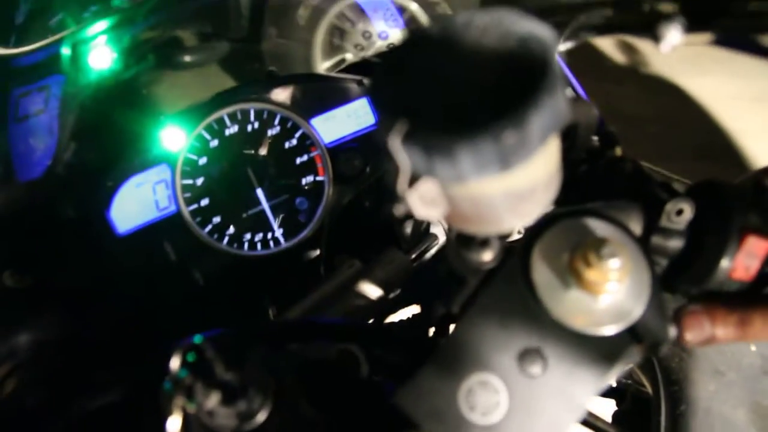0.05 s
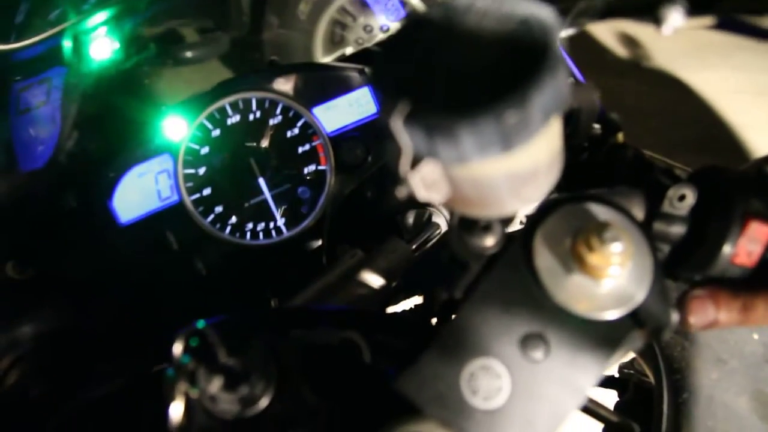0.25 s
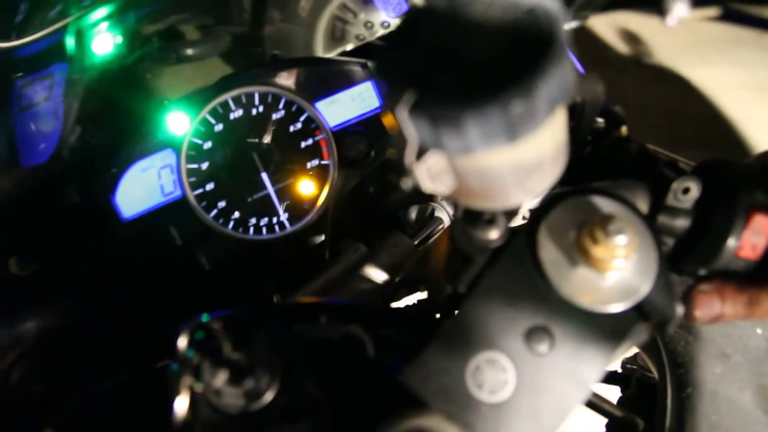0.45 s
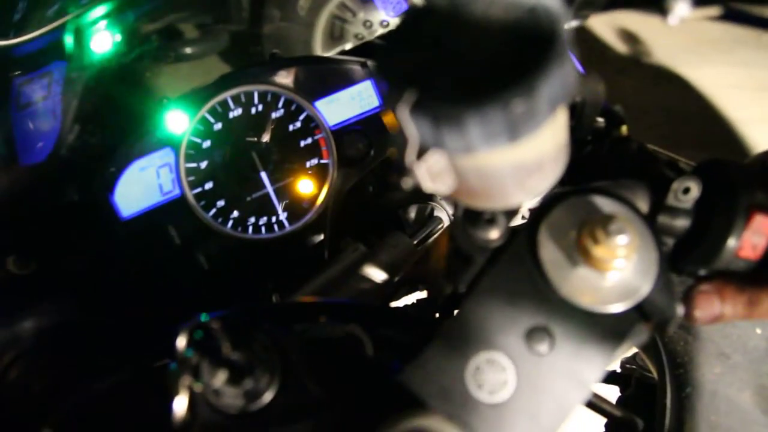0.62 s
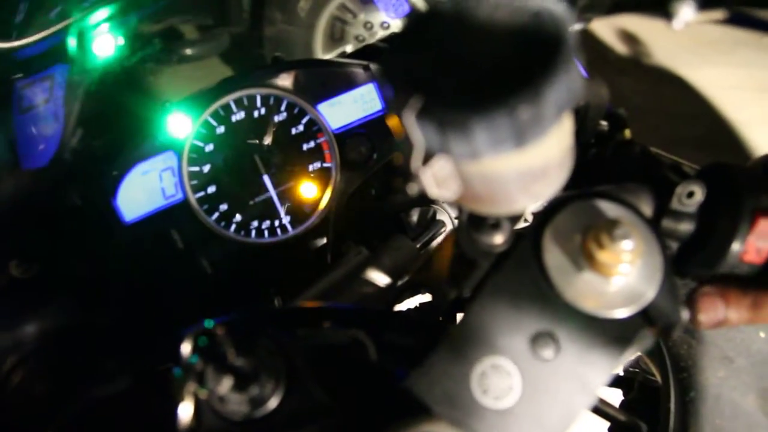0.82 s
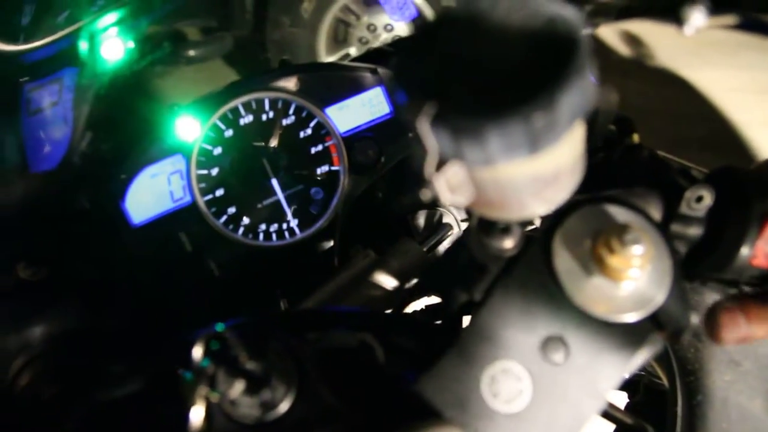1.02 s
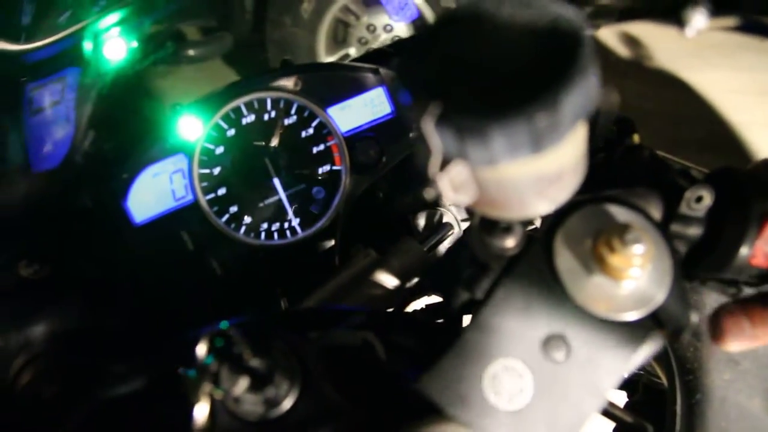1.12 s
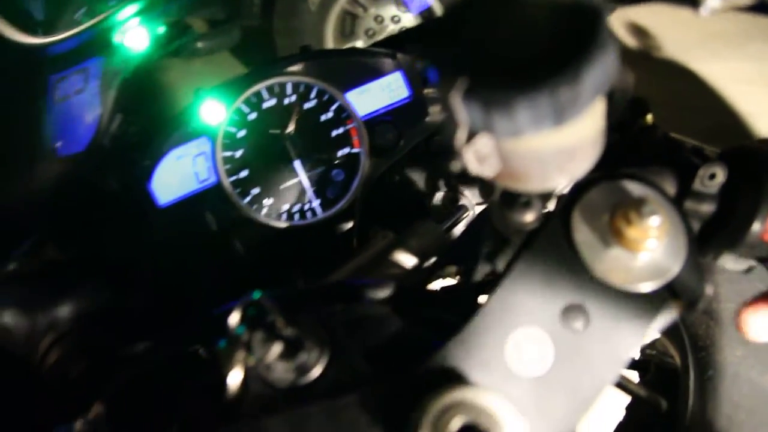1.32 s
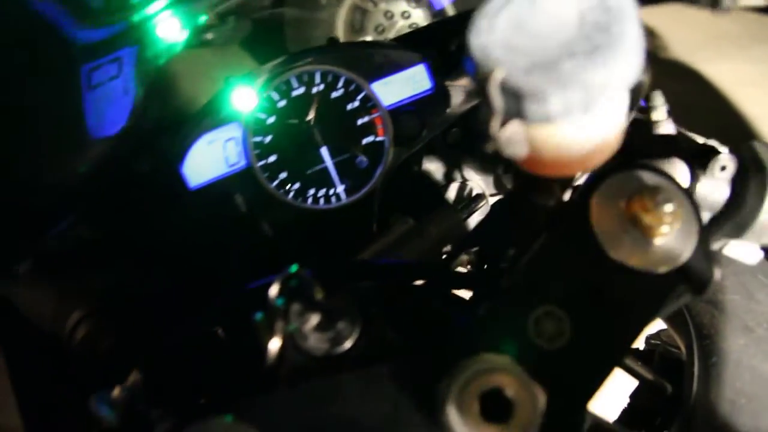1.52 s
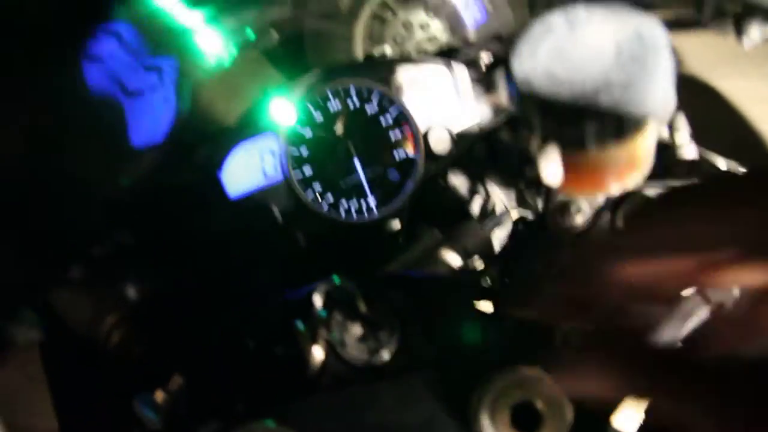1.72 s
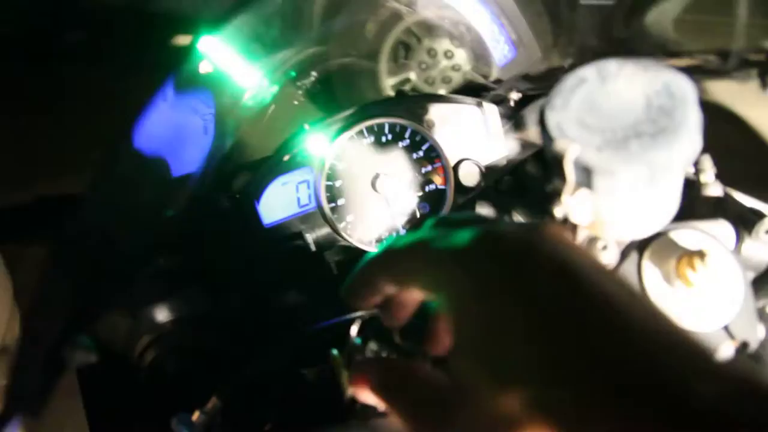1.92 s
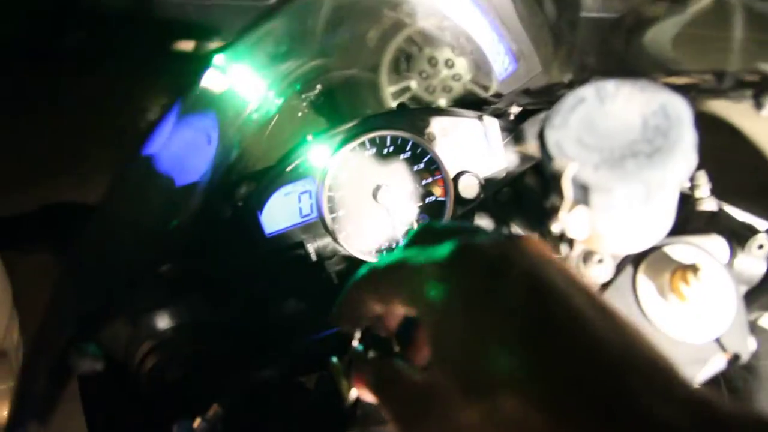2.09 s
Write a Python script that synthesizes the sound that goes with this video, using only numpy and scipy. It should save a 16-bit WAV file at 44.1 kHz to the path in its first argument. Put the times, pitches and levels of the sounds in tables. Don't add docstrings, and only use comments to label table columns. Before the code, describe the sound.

Close outdoor recording at night: steady insect whine, a relay clack, a short gritty whirring grind from a motorbike starter, quick rattling stop, small springy button clicks, then insects, faint traffic rumble and light cloth rustle.

```python
import sys
import numpy as np
from scipy import signal
from scipy.fft import rfft, irfft, next_fast_len
from scipy.io import wavfile
from scipy.ndimage import map_coordinates

SR = 44100
rng = np.random.default_rng(int(sys.argv[2]) if len(sys.argv) > 2 else 0)


def output_pcm(signal):
    pcm = np.clip(np.atleast_2d(signal).T, -1, 1) * 32767
    wavfile.write(sys.argv[1], SR, np.round(pcm).astype(np.int16))


def to_linear_factor(level_db):
    exponent = np.asarray(level_db, float) / 20
    return 10 ** exponent


N = 94815
TIME = np.arange(N) / SR


def unit(x):
    return x / np.sqrt(np.mean(x ** 2) + 1e-20)


def along(points, hz):
    f, v = np.transpose(points)
    return np.interp(np.log(hz + 1), np.log(f + 1), v)


def curves(rows):
    s, *cols = np.transpose(rows)
    return [np.interp(TIME, s, c) for c in cols]


def wobble(rate):
    return map_coordinates(rng.standard_normal(4000), [TIME * rate])


def filtered(x, response):
    m = next_fast_len(N + SR // 2)
    return irfft(rfft(x, m) * response(np.fft.rfftfreq(m, 1 / SR)), m)[..., :N]


def peaks(rows):
    def response(f):
        total = 0
        for k, (hz, width, db) in enumerate(rows):
            damping = 1j * f * width
            total = total + (-1) ** k * to_linear_factor(db) * damping / (hz * hz - f * f + damping)
        return total
    return response


def noise(points):
    return unit(filtered(rng.standard_normal(N), lambda hz: to_linear_factor(along(points, hz))))


def band(hz, width_hz):
    return unit(filtered(rng.standard_normal(N), lambda f: peaks([(hz, width_hz, 0)])(f) ** 2))


def burst(s, t60, rise_s):
    t = np.clip(TIME - s, 0, None)
    return to_linear_factor(-60 * t / t60) * (1 - np.exp(-t / rise_s))


# (time [s], grinding force [dB], armature whine [dB])
EFFORT = [
    (.278, -24.5, -38),
    (.292, -18, -47),
    (.324, -18, -30),
    (.42, -17.5, -27),
    (.56, -17.5, -27),
    (.64, -20.5, -40),
    (.72, -20, -39),
    (.785, -18, -27),
    (.83, -57, -74),
]
# (time [s], strength [dB])
CATCHES = [(0.284, -11.5), (0.304, -24), (.351, -15), (0.545, -13.5), (.585, -20), (0.619, -15),
           (0.649, -19), (0.656, -13), (0.69, -16.5), (0.735, -16.5), (0.758, -15.5), (0.781, -20),
           (0.798, -25), (.817, -21.5)]
# (frequency [Hz], width [Hz], level [dB])
CASING = [(323, 116, -4), (413, 46, -21), (1282, 45, 4.5), (1963, 61, -4), (3095, 210, 3.5), (3270, 120, 4),
          (3340, 130, 3), (3770, 43, -20), (4500, 74, -33), (5640, 31, 12.5), (7400, 46, -3.5),
          (8500, 220, 4.5)]
# (frequency [Hz], density [dB per Hz])
SCRAPE = [(200, -63), (240, -16), (1120, -12), (1260, -3), (2450, -8.5), (3500, -3), (13300, -21),
          (14300, -34)]
# (time [s], level [dB])
COAST = [
    (.8, -32),
    (.85, -36.5),
    (.92, -41.5),
    (.94, -68),
]
# (frequency [Hz], density [dB per Hz])
COAST_COLOUR = [(500, -23), (900, -11), (2000, 0.5), (3800, -1.5), (5000, -13), (9000, -25)]
COAST_END_S = 0.9
GRITS_PER_S, GRIT_DB, GRIT_TOP_DB = 3000, 2.5, 9
CASING_DB, LUMP_DB = -7, 2
CATCH_T60, CATCH_RISE_S = 0.051, 0.003
NOTCH_HZ, NOTCH_WIDTH_HZ, NOTCH_DEPTH = 512, 76, 0.59
KNOCK_RISE_S, KNOCK_SCRAPE_DB = 0.0012, -10


def starter():
    force_db, _ = curves(EFFORT)
    draw = rng.random((2, N))
    grit_db = np.minimum(-GRIT_DB * np.log(draw[1] + 1e-4), GRIT_TOP_DB)
    is_grit = draw[0] < GRITS_PER_S / SR
    grit = np.clip(rng.standard_normal(N), -2, 2) * (1 + is_grit * to_linear_factor(grit_db))
    drive = running() * to_linear_factor(force_db + LUMP_DB * wobble(200))
    drive = drive + sum(to_linear_factor(db) * burst(s, CATCH_T60, CATCH_RISE_S) for s, db in CATCHES)
    drive = drive + sum(to_linear_factor(db + KNOCK_SCRAPE_DB) * burst(s, 0.011, KNOCK_RISE_S) for s, db in KNOCKS)

    def scrape(hz):
        notch = 1 - NOTCH_DEPTH * np.exp(-((hz - NOTCH_HZ) / NOTCH_WIDTH_HZ) ** 2)
        return to_linear_factor(along(SCRAPE, hz)) * notch

    def casing(hz):
        return peaks(CASING)(hz) * np.clip(hz / 400, 0, 1) ** 2 * np.clip(9000 / (hz + 1), 0, 1) ** 4

    broad = unit(filtered(grit * drive, scrape))
    rung = unit(filtered(grit * drive, casing))
    grind = 0.68 * np.sqrt(np.mean(drive ** 2)) * (broad + to_linear_factor(CASING_DB) * rung)
    coast_db, = curves(COAST)
    turning = (TIME > COAST[0][0]) & (TIME < COAST_END_S)
    coast = turning * to_linear_factor(coast_db + 1.3 * wobble(118.3)) * noise(COAST_COLOUR)
    return grind + knocks() + coast


# (time [s], level [dB])
KNOCKS = [(0.2895, -12), (0.2974, -13), (0.309, -12), (0.3168, -10), (0.3237, -10.5), (0.332, -16),
          (0.34, -11), (0.3481, -12), (0.3596, -18), (0.369, -15), (0.3806, -13), (0.3872, -16),
          (0.4017, -10), (0.412, -14), (0.4234, -18), (0.4296, -13), (0.4379, -15), (0.447, -12),
          (0.457, -12), (0.4714, -11), (0.4808, -18), (0.4862, -24), (0.496, -19), (0.512, -26),
          (0.5221, -23), (0.5422, -11), (0.5594, -15), (0.5668, -17), (0.5762, -12), (0.5845, -5.5),
          (0.5907, -12), (0.6088, -12), (0.6195, -8), (0.6292, -19), (0.6395, -11), (0.6491, -7),
          (0.6571, -5), (0.666, -22), (0.677, -16), (0.691, -15), (0.6975, -20), (0.7106, -17),
          (0.7282, -18), (0.7376, -16), (0.7458, -15), (0.7556, -7), (0.7764, -8), (0.7831, -14),
          (0.7966, -15.5), (0.8166, -15)]
# (time [s], level [dB])
MORE_KNOCKS = [
    (.8005, -17),
    (0.8083, -21),
    (0.8226, -20),
]
# (frequency [Hz], level [dB], decay t60 [s])
KNOCK_MODES = [(3076, 0.5, 0.023), (3196, 3, 0.031), (3332, -1, 0.022), (3500, -5, 0.014),
               (2870, -10, .012), (3880, -2, 0.013)]
KNOCK_DB = -4


def knocks():
    t, out = np.arange(SR // 16) / SR, np.zeros(N + SR)
    hz, level, t60 = np.transpose(KNOCK_MODES)[:, :, None]
    strikes = [*KNOCKS, *MORE_KNOCKS]
    chance = rng.standard_normal((len(strikes), 2, len(KNOCK_MODES), 1))
    for (s, db), (louder, sharper) in zip(strikes, chance):
        decay = to_linear_factor(level + 1.8 * louder - 60 * t / t60)
        ring = decay * np.sin(2 * np.pi * hz * (1 + 0.0089 * sharper) * t)
        out[round(s * SR):][:len(t)] += to_linear_factor(db + KNOCK_DB) * ring.sum(0) * (1 - np.exp(-t / KNOCK_RISE_S))
    return out[:N]


# (time [s], speed [turns per s])
SPEED = [
    (.278, 98),
    (.292, 110),
    (.306, 118.5),
    (.324, 126),
    (.4, 129),
    (.55, 125.7),
    (.64, 118.5),
    (.785, 112.5),
    (.83, 105),
]


def running():
    return burst(SPEED[0][0] - .006, 99, .002) * (TIME < SPEED[-1][0])


# (multiple of the shaft speed, level [dB])
WHINE_ORDERS = [(5, -8.5), (6, -11.5), (7, -9), (10, -16), (11, -7), (14, -1), (28, -4.5)]
# (multiple of the shaft speed, level under the grinding force [dB])
HUM_ORDERS = [(2, -18), (3, -22.5)]
# (frequency [Hz], width [Hz], lift [dB])
SHELL = [(1726, 38, 9.5), (902, 23, 8.5), (3630, 50, 5), (653, 17, 3)]
JITTER, UNEVEN_DB = 0.0039, 1.3


def armature():
    rps, = curves(SPEED)
    force_db, whine_db = curves(EFFORT)
    turn = 2 * np.pi * np.cumsum(rps * (1 + JITTER * wobble(60))) / SR

    def orders(rows):
        total = 0
        for k, db in rows:
            lift = sum(lift_db * np.exp(-((k * rps - hz) / w) ** 2) for hz, w, lift_db in SHELL)
            total = total + to_linear_factor(db + UNEVEN_DB * wobble(30.9) + lift) * np.sin(k * turn + k)
        return total

    whine = to_linear_factor(whine_db) * orders(WHINE_ORDERS)
    hum = to_linear_factor(force_db) * orders(HUM_ORDERS) * np.clip((rps - 105) / 14.6, .1, 1)
    return running() * (whine + hum)


# (time [s], level [dB], decay t60 [s])
RELAY = [
    (0.2691, -8, 0.053),
    (0.7717, -19, 0.074),
]
# (frequency [Hz], density [dB per Hz])
CLOSING = [(530, -54), (900, -22), (2240, -4), (2850, -8.5), (4430, -9), (5370, 0), (6430, -8), (7980, -7),
           (15800, -24.5)]
# (frequency [Hz], density [dB per Hz])
OPENING = [(1000, -5), (3000, 9), (8000, -20), (12000, 3), (15500, -2)]


def relay():
    colours = (CLOSING, OPENING)
    return sum(to_linear_factor(db) * burst(s, t60, 0.00066) * noise(colour) for (s, db, t60), colour in zip(RELAY, colours))


# (frequency [Hz], level [dB], decay t60 [s])
ENGAGE = [(1280, -15, .08), (1400, -20, .05), (1540, -16, .07), (1750, -20, .04), (2050, -20, .05)]
# (frequency [Hz], level [dB], decay t60 [s])
FRAME = [(928, -32, 1.2), (764, -40, 0.56), (332, -26, 0.13), (420, -29, 0.16)]
ENGAGE_S, FRAME_SHAKE_S, FRAME_S, FRAME_END_S = .286, 0.68, .76, 1.0
FRAME_SHAKE_DB = -34


def frame():
    engage = sum(to_linear_factor(db) * burst(ENGAGE_S, t60, 0.0016) * np.sin(2 * np.pi * hz * TIME) for hz, db, t60 in ENGAGE)
    ring = 0
    for hz, db, t60 in FRAME:
        level = to_linear_factor(db + 1.4 * wobble(25.6)) * burst(FRAME_S, t60, .006)
        ring = ring + level * np.sin(2 * np.pi * hz * TIME + 0.26 * wobble(30))
    damped = np.clip((FRAME_END_S - TIME) / 0.11, 0, 1)
    shake = np.clip(np.minimum((TIME - FRAME_SHAKE_S) / 0.045, (FRAME_S + 0.032 - TIME) / .015), 0, 1)
    return engage + ring * damped + to_linear_factor(FRAME_SHAKE_DB) * shake * band(FRAME[0][0], 45)


# (time [s], level [dB], decay t60 [s], share of ringing, housing level [dB])
TICKS = [(.9223, -42, .015, .2, -9), (1.1764, -16, 0.025, 1, 1), (1.183, -23.5, 0.039, 0.25, -3),
         (1.2082, -26.5, 0.014, .16, 14.5), (1.271, -31.5, 0.022, 0.078, -6),
         (1.3093, -41.5, 0.087, .05, -4), (1.3304, -40, .012, .1, 0), (1.5109, -43, .015, .05, -9),
         (1.54, -48, .015, .05, -7), (2.0961, -23, 0.0088, .05, 4.5), (2.098, -36, 0.0068, .05, -12)]
# (frequency [Hz], level [dB], decay t60 [s])
SPRING = [(2220, -20, 0.11), (8140, -8, .03), (8580, -4, .026), (9270, -5, .035), (9970, -4, .04),
          (10000, 4.5, 0.037), (10570, -1, 0.016), (11560, 0, .022), (12370, 1, .022), (12730, -2, 0.029),
          (14400, 0, .016), (15430, 0, .014)]
# (frequency [Hz], density [dB per Hz])
SNAP = [(1060, -63), (1800, -28), (2250, -15), (2680, -15), (5080, -14), (7100, -14.5), (9910, -8),
        (15900, -26), (16500, -42)]
# (frequency [Hz], width [Hz], level [dB])
HOUSING = [(2320, 23, -9.5), (3900, 400, -24), (7100, 370, -21.5), (345, 220, -22)]


def button():
    t, rings = np.arange(SR // 8) / SR, np.zeros(N + SR)
    for s, db, _, ringing, _ in TICKS:
        ring = 0
        for hz, level, t60 in SPRING:
            ring = ring + to_linear_factor(level + rng.normal(0, 1.4) - 60 * t / t60) * np.sin(2 * np.pi * hz * t)
        rings[round(s * SR):][:len(t)] += to_linear_factor(db) * ringing * ring * (1 - np.exp(-t / 0.00061))
    snaps = sum(to_linear_factor(db) * burst(s, t60, 0.001) for s, db, t60, *_ in TICKS) * noise(SNAP)
    blows = sum(to_linear_factor(db + housing_db + 22.5) * burst(s, 0.0093, 0.00043) for s, db, *_, housing_db in TICKS)
    return rings[:N] + snaps + filtered(blows * rng.standard_normal(N), peaks(HOUSING))


# (frequency [Hz], decay t60 [s])
WALL = [(500, 0.58), (3000, 0.24), (8000, 0.19), (15000, 0.15)]


def wall(x):
    hz, t, z = signal.stft(rng.standard_normal(SR // 2), SR, nperseg=256)
    tail = signal.istft(z * to_linear_factor(-60 * t / along(WALL, hz)[:, None]), SR, nperseg=256)[1]
    return signal.fftconvolve(np.pad(x, (300, 0)), tail / np.linalg.norm(tail))[:N]


TRILL_PER_S, DUTY = 56, 1.3


def trill(hz, per_s):
    beat = np.pi * (per_s * TIME + rng.random() + 0.13 * wobble(9.43))
    pulses = to_linear_factor(2.9 * wobble(29.63)) * np.abs(np.sin(beat)) ** DUTY
    return unit(pulses * np.sin(2 * np.pi * hz * TIME + 3.0 * wobble(26)))


# (time [s], level [dB])
CHORUS = [(0, -35), (.12, -33.5), (.24, -30), (.85, -36), (1.1, -32.5), (1.2, -36), (1.38, -36),
          (1.5, -33.5), (1.6, -33.5), (1.75, -31), (1.95, -33), (2.15, -34)]
# (start [s], length [s], frequency [Hz], level [dB])
SOLOS = [
    (1.47, 0.26, 4420, -49),
    (1.61, 0.33, 4480, -52),
    (1.57, 0.33, 4760, -48.5),
    (1.4, 0.2, 5600, -46),
    (0.048, 0.31, 10290, -57),
]
# (frequency [Hz], width [Hz], level [dB])
WASH = [(5046, 500, -6), (5215, 350, -3), (5905, 810, -10.5)]
# (frequency [Hz], width [Hz], level [dB])
DRONES = [(2574, 188, -47), (2780, 200, -54), (3490, 210, -53)]
CHORUS_HZ, SPREAD_HZ, WASH_DB = 5228, 110, -2
SOLO_BLUR, SOLO_WIDTH_HZ = 0.76, 180
ECHO = 0.61
OVERTONE_HZ, OVERTONE_WIDTH_HZ, OVERTONE_DB, OVERTONE_GROWS = 10410, 730, -58, 1.2


def insects():
    near = 0
    rows = rng.standard_normal((9, 2))
    for place, (detune, hurry) in zip(np.linspace(-1.25, 1.6, len(rows)), rows):
        voice = trill(CHORUS_HZ + SPREAD_HZ * (place + .2 * detune), TRILL_PER_S + 2.3 * hurry)
        near = near + to_linear_factor(2.8 * wobble(2.78)) * voice
    far = sum(to_linear_factor(db) * band(hz, w) for hz, w, db in WASH)
    level_db, = curves(CHORUS)
    chorus = to_linear_factor(level_db) * unit(unit(near) + to_linear_factor(WASH_DB) * far)
    solos = 0
    for s, length, hz, db in SOLOS:
        fade = np.clip(np.minimum((TIME - s) / 0.055, (s + length - TIME) / 0.15), 0, 1)
        solos = solos + to_linear_factor(db) * fade * (trill(hz, TRILL_PER_S) + SOLO_BLUR * band(hz, SOLO_WIDTH_HZ))
    drones = sum(to_linear_factor(db + 1.64 * wobble(5.07)) * band(hz, w) for hz, w, db in DRONES)
    overtone_db = OVERTONE_DB + OVERTONE_GROWS * (level_db - level_db.mean())
    overtone = to_linear_factor(overtone_db) * band(OVERTONE_HZ, OVERTONE_WIDTH_HZ)
    return chorus + solos + ECHO * wall(solos) + drones + overtone


# (frequency [Hz], density [dB per Hz])
RUMBLE = [(15, -52), (25, -85), (43, -7), (114, -4.5), (378, -12.5), (520, -12), (627, -16), (895, -11),
          (2200, -27), (2860, -76), (4840, -120)]
# (frequency [Hz], density [dB per Hz])
HISS = [(1500, 3), (4000, 1), (6800, -3), (8500, -7.5), (12000, -3), (15500, -13)]
# (time [s], level [dB])
RUSTLE = [
    (1.3, -80),
    (1.5, -62),
    (1.75, -56),
    (2.0, -56),
    (2.15, -49.5),
]
# (frequency [Hz], density [dB per Hz])
CLOTH = [(1500, -30), (4000, -26), (8000, 6), (12000, -1), (15500, -14)]
RUMBLE_DB, ENGINE_HZ, ENGINE_DB, HISS_DB = -43.5, 108.3, -52.5, -53.5


def street():
    rustle_db, = curves(RUSTLE)
    traffic = to_linear_factor(RUMBLE_DB + 0.46 * wobble(7.57)) * noise(RUMBLE)
    engine = to_linear_factor(ENGINE_DB) * band(ENGINE_HZ, 9.9)
    hiss = to_linear_factor(HISS_DB) * noise([(600, -26), *HISS])
    return traffic + engine + hiss + to_linear_factor(rustle_db) * noise(CLOTH)


WALL_DB, TONES_WET, TICKS_WET = -7.5, .12, 0.24


def scene():
    bike = starter() + relay()
    tones = armature() + frame()
    ticks = button()
    echo = to_linear_factor(WALL_DB) * wall(bike + TONES_WET * tones + TICKS_WET * ticks)
    return (bike + tones + ticks + echo + insects() + street())[None]


def top_cut(x):
    return signal.sosfilt(signal.butter(12, 16830, fs=SR, output="sos"), x)


TOP = .85
TOP_HZ, EDGE_HZ, LEAK = 15720, 150, .012


def record(dry):
    soft = dry / (1 + np.abs(dry / TOP) ** 4) ** .25
    mix = filtered(soft, lambda hz: np.clip((TOP_HZ - hz) / EDGE_HZ + .5, LEAK, 1))
    return top_cut(mix)


dry = scene()
out = record(dry)
output_pcm(out)
```